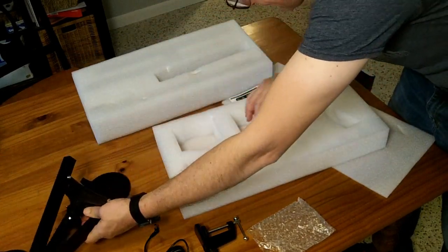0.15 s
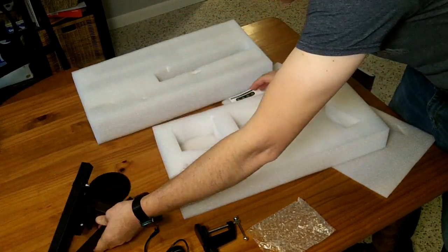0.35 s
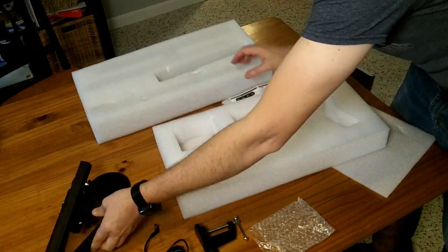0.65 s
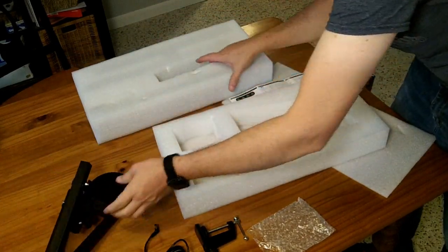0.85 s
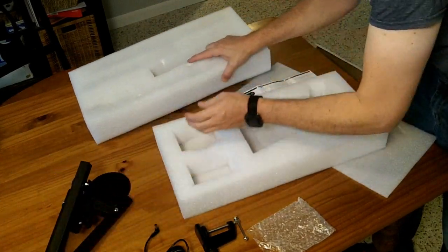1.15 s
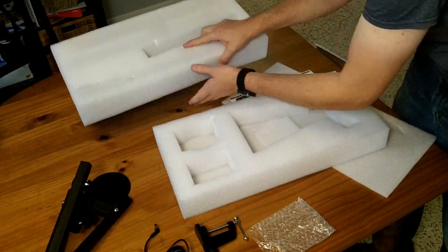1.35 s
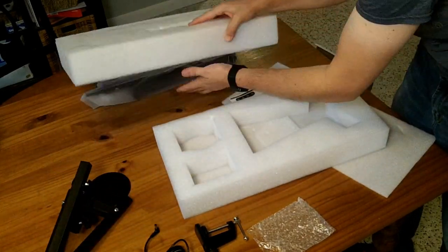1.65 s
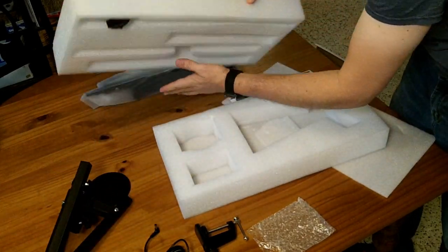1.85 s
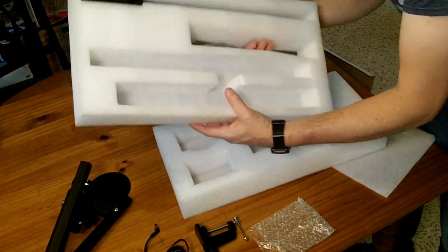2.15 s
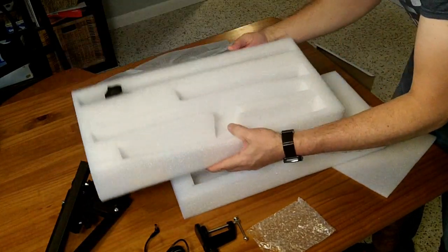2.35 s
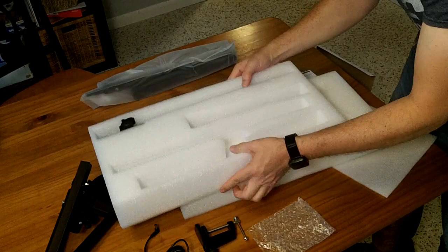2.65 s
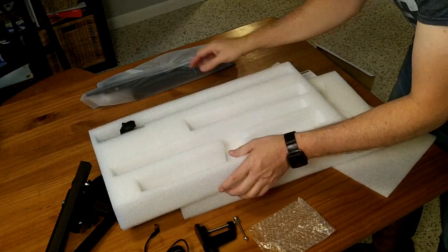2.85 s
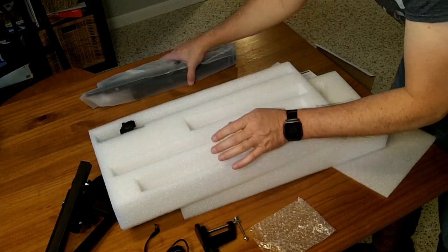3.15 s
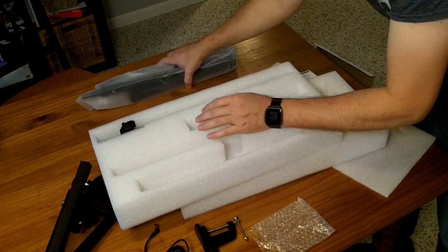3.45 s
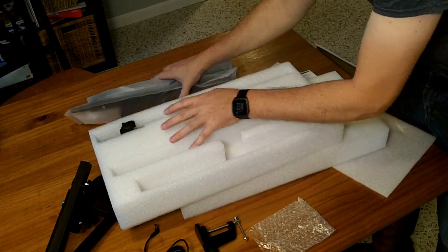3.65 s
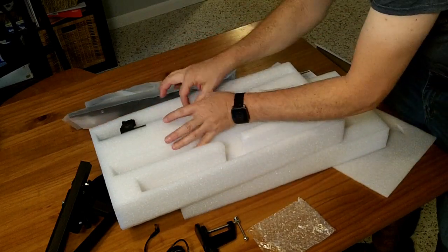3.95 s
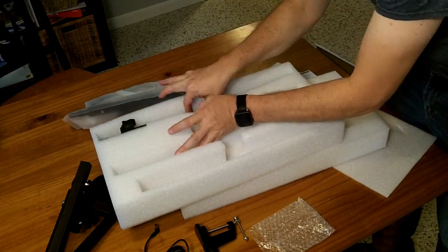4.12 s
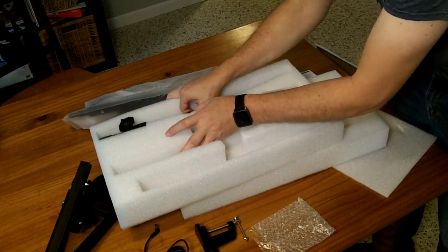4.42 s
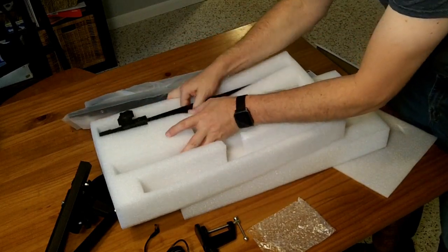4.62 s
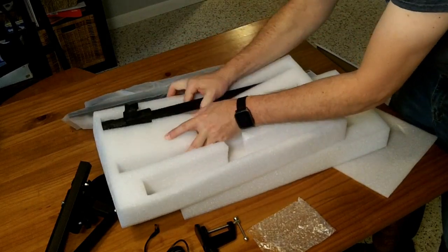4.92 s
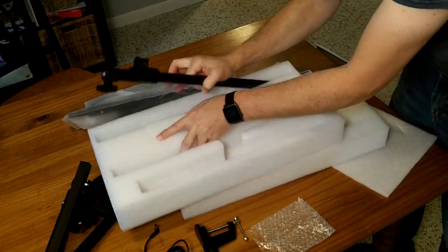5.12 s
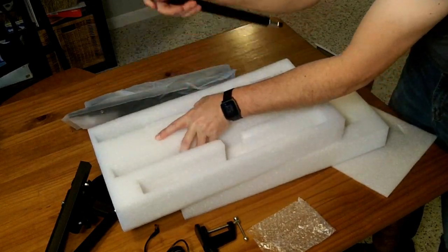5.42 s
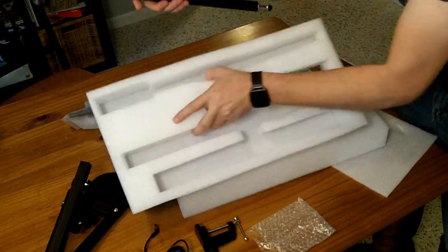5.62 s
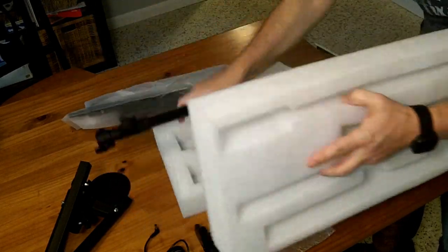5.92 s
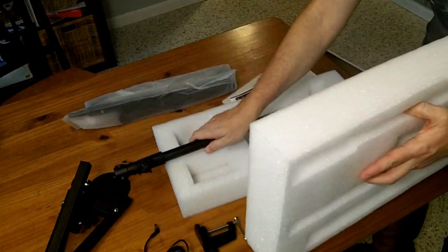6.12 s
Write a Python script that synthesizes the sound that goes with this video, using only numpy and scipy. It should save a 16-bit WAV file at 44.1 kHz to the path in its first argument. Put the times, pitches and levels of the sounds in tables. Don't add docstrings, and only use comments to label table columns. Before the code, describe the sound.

A loud wooden scrape and a clattering metal set-down come first. Dry foam rubbing follows in short irregular strokes, with crackly cell pops, faint skin squeaks and muffled thumps on the table top. Midway a thin bag rustles and drags with a low groan. The sharpest snaps come late, then handling fades into steady room hiss, heard from about a metre through a modest camera microphone.

```python
import sys
import numpy as np
from scipy import signal
from scipy.fft import rfft, irfft, next_fast_len
from scipy.io import wavfile
from scipy.ndimage import uniform_filter1d

SR = 44100
rng = np.random.default_rng(int(sys.argv[2]) if len(sys.argv) > 2 else 0)


def to_wav(sig):
    pcm = np.clip(np.atleast_2d(sig), -1, 1) * 32767
    pcm = np.round(pcm).astype(np.int16)
    wavfile.write(sys.argv[1], SR, pcm.T)


def linear_from_db(decibels):
    return 10 ** (np.asarray(decibels, float) / 20)


N = 276683
T = np.arange(N) / SR


def level(x, db=0):
    return x * linear_from_db(db) / np.sqrt(np.mean(x ** 2))


def colour(x, points, lo_hz=1, hi_hz=30000, slope=5):
    size = next_fast_len(N + 8192)
    size += size % 2
    f = np.maximum(np.fft.rfftfreq(size, 1 / SR), 1)
    hz, db = np.transpose(points)
    gain = linear_from_db(np.interp(np.log(f), np.log(hz), db))
    gain = gain / np.sqrt((1 + (lo_hz / f) ** slope) * (1 + (f / hi_hz) ** slope))
    cepstrum = irfft(np.log(gain + 1e-7))
    cepstrum[1:size // 2] *= 2
    cepstrum[size // 2 + 1:] = 0
    return irfft(rfft(x, size) * np.exp(rfft(cepstrum)))[:N]


def bandpass(x, order, lo_hz, hi_hz):
    return signal.sosfilt(signal.butter(order, [lo_hz, hi_hz], "band", fs=SR, output="sos"), x)


def ring(x, modes):
    out = 0
    for hz, db, t60_s in modes:
        pole = np.exp(2j * np.pi * hz / SR - np.log(1000) / (t60_s * SR))
        out = out + linear_from_db(db) * signal.lfilter([1], [1, -pole], x).imag
    return out


def walk(rate_hz):
    k = int(SR / rate_hz)
    held = np.repeat(rng.standard_normal(N // 50), k)[:N]
    return uniform_filter1d(uniform_filter1d(held, k), k)


def curves(table, fade_s=0.0064):
    s, *columns = np.transpose(table)
    gate = np.clip(np.minimum(T - s[0], s[-1] - T) / fade_s + 1, 0, 1)
    return gate, [np.interp(T, s, c) for c in columns]


def grains(per_s, spread_db):
    hit, size, sign = rng.random((3, N))
    return level((hit < per_s / SR) * linear_from_db(-spread_db * np.log(size + .03)) * np.sign(sign - .5))


def blows(rows):
    out = np.zeros(N + SR)
    for s, db, ms in rows:
        n = max(int(ms * SR / 1000), 2)
        start = int(s * SR)
        out[start:start + n] += linear_from_db(db) * np.sin(np.pi * (np.arange(n) + .5) / n) / n
    return out[:N]


SWELL_DB = 10.5
LET_GO_DB, LET_GO_S = 4, 0.017


def strokes(rows, release_db_s):
    t = T[::32]
    s, swell, hold, db = np.transpose(rows)[:, :, None]
    swell, hold = np.maximum(swell, .001), np.maximum(hold, 0)
    after = np.maximum(t - s - swell - hold, 0)
    db = db - SWELL_DB * np.clip(1 - (t - s) / swell, 0, 1)
    db = db - release_db_s * after - LET_GO_DB * np.minimum(after / LET_GO_S, 1)
    power = np.sum((t >= s) * linear_from_db(2 * db), axis=0)
    return np.interp(T, t, 10 * np.log10(power + 1e-12))


# f/Hz, density/dB
FOAM_TONE = [(35, -52), (60, 4), (108, -33), (213, -2.5), (289, -4.5), (523, 9), (853, 0), (1160, 3.5),
             (1480, 1.5), (3490, -3.5), (6180, -9.5), (7280, -16), (7900, -25), (10300, -71), (17400, -120)]
# start/s, swell/s, hold/s, level/dB, weight on block/dB
HAND_STROKES = [(0.354, 0.083, 0.11, -55, -2), (0.569, 0.0091, 0.061, -51.5, -0.5),
                (0.703, 0.0011, 0.0032, -35, 4), (0.924, 0.034, 0.073, -46, 2.5), (1.044, .012, 0.062, -52.5, 0),
                (1.134, 0.047, 0.091, -39.5, -1.5), (1.271, 0.022, 0.078, -40.5, -2.5),
                (1.342, 0.017, 0.038, -39.5, 1), (1.572, .003, 0.0033, -52, -6), (1.9, .006, 0.16, -62.5, -6),
                (2.075, 0.0034, 0.055, -43, -1), (2.131, 0.021, 0.011, -38, -1), (2.182, .01, 0.082, -49, 2),
                (2.278, .004, 0.039, -35.5, -2), (2.345, 0.025, 0.012, -38, -6), (2.39, .01, 0.077, -41.5, -6),
                (2.449, 0.052, 0.0051, -40, -2.5), (2.52, 0.018, 0.1, -50.5, 3),
                (2.61, 0.011, 0.021, -39.5, -1.5), (2.652, 0.033, 0.071, -38.5, -4),
                (2.788, 0.015, 0.044, -38, -5.5), (2.864, .01, 0.078, -52, 4), (2.942, 0.02, 0.037, -54.5, 0),
                (3.01, 0.015, 0.021, -48.5, 0.5),
                (3.191, 0.047, 0.059, -40, -5), (3.33, 0.045, 0.013, -43, -1.5),
          (3.829, 0.025, 0.052, -44.5, 1.5), (4.0, 0.029, 0.022, -47.5, 1),
          (4.053, 0.0046, 0.042, -42, 1.5), (4.115, 0.0031, .004, -35.5, -5), (4.17, 0.04, 0.04, -41.5, 1),
          (4.25, 0.035, 0.16, -44.5, 2), (4.31, 0.022, .03, -41, 1), (4.411, 0.0082, 0.014, -38, -2),
          (4.444, 0.0036, 0.0061, -35, -1.5), (4.465, 0.005, 0.01, -33.5, -4),
          (4.5, 0.022, 0.14, -47, -0.5), (4.69, 0.034, 0.19, -51.5, -0.5), (4.919, 0.29, 0.049, -41.5, 0.5),
          (5.149, 0.00093, 0.0096, -27, -1.5), (5.17, 0.003, 0.0038, -28.5, 0.5),
          (5.19, 0.0072, 0.023, -44, 0), (5.24, 0.024, 0.11, -40, -4.5), (5.33, 0.039, 0.042, -38.5, 0),
          (5.56, 0.074, 0.026, -46, -2.5), (5.66, 0.032, 0.034, -44.5, -0.5),
          (5.885, 0.013, 0.0044, -53.5, -2), (5.93, 0.12, 0.044, -56, -9), (6.104, 0.0085, 0.032, -53, 1.5)]
# start/s, swell/s, hold/s, level/dB, weight/dB
BAG = [
    (3.447, 0.093, 0.13, -56, -3),
    (3.574, 0.035, 0.073, -51.5, -1),
    (3.656, 0.049, 0.067, -48, 2),
    (3.763, 0.03, 0.06, -47, -2),
]
RELEASE_DB_S = 136
FIZZ_DB, SCRAPE_DB, HUM_DB = -3.5, -0.5, -7
FIZZ_PER_WEIGHT, SCRAPE_PER_WEIGHT, HUM_PER_WEIGHT = 0.33, 0.94, 1.55
RUSTLE_LINGERS, SCRAPE_LINGERS, HUM_LINGERS = 0.86, 0.75, 0.62
BAG_THIN_DB, BAG_FIZZ_DB, BAG_HOLLOW_DB = -7, 6.5, -5
CRACKLE = 0.2


def foam():
    rows = np.vstack([HAND_STROKES, BAG])
    bag = np.arange(len(rows)) >= len(rows) - len(BAG)
    shape, db, weight = rows[:, :3], rows[:, 3], rows[:, 4]

    def layer(rel_db, per_weight, lingers):
        return strokes(np.c_[shape, db + rel_db + per_weight * weight], lingers * RELEASE_DB_S)

    rustle_db = layer(BAG_THIN_DB * bag, 0, RUSTLE_LINGERS)
    bag_db = strokes(np.array(BAG)[:, :4], RELEASE_DB_S) - 2.5
    fizz_db = layer(FIZZ_DB + BAG_FIZZ_DB * bag, FIZZ_PER_WEIGHT, 1)
    scrape_db = layer(SCRAPE_DB + BAG_HOLLOW_DB * bag, SCRAPE_PER_WEIGHT, SCRAPE_LINGERS)
    hum_db = layer(HUM_DB, HUM_PER_WEIGHT, HUM_LINGERS)

    grit = np.clip(0.27 + 0.021 * (rustle_db + 44.5), 0, 1)
    slips = np.sqrt(1 - grit) * rng.standard_normal(N) + np.sqrt(grit) * grains(2500, 3.0)
    slips = slips * linear_from_db(1.64 * walk(45)) + CRACKLE * grains(260, 3.9)
    bands = [(1836, 4170, rustle_db), (3000, 4300, bag_db), (4500, 4890, fizz_db),
             (656, 2100, scrape_db), (109, 434, hum_db)]
    out = 0
    for lo_hz, hi_hz, band_db in bands:
        out = out + level(colour(slips, FOAM_TONE, lo_hz, hi_hz)) * linear_from_db(band_db + 1.4 * walk(22.116))
    return out


# start/s, end/s, level/dB
PAUSES = [
    (1.045, 1.058, -4),
    (2.386, 2.445, -2.5),
    (3.041, 3.188, -4),
    (5.735, 5.88, -2.5),
]


def pauses():
    return linear_from_db(sum(db * np.clip(np.minimum(T - a, b - T) / .006, 0, 1) for a, b, db in PAUSES))


# t/s, level/dB, f/Hz, t60/s
SNAPS = [(1.1712, -27, 3800, 0.066), (1.351, -21, 4260, 0.093), (1.6053, -33, 2400, 0.034),
         (2.079, -32, 3160, 0.025), (2.1439, -35, 3570, 0.025), (2.2802, -30, 2270, 0.068),
         (2.379, -20.5, 4030, 0.039), (2.6093, -27, 4070, 0.079), (2.799, -23, 2990, 0.021),
         (3.1943, -29, 4050, 0.04), (3.2212, -27, 3080, 0.032), (4.0148, -31, 3120, 0.032),
         (4.0585, -20, 3670, 0.071), (4.1204, -13.5, 4000, 0.027), (4.414, -18.5, 3970, 0.043),
         (4.4298, -15, 2920, 0.059), (4.4494, -18, 3730, 0.018), (4.4773, -10.5, 3600, 0.023),
         (4.8703, -30.5, 4500, 0.064), (5.0867, -25, 3180, 0.05), (5.1503, -7.5, 3840, 0.036),
         (5.1735, -6, 3100, 0.025), (5.956, -35, 4100, 0.04), (6.233, -32.5, 3630, 0.04)]
# t/s, level/dB, f/Hz, t60/s
TICKS = [(1.5707, -37, 3030, 0.0092), (1.903, -42, 3300, 0.0077), (3.2833, -23, 3440, 0.0059),
         (3.5032, -28.5, 5850, 0.0092), (3.682, -32, 3780, 0.0096), (4.4368, -20.5, 3000, 0.0096),
         (4.4785, -18, 3370, 0.0097), (4.5044, -37, 4500, 0.0081), (4.527, -34, 4640, 0.011),
         (5.285, -38, 4100, 0.0053), (5.459, -38, 4500, 0.0038)]
TICK_SPIKE = 0.37


def snaps(rows, gain_db, spike=0.0):
    out, t = np.zeros(N + SR), T[:8192]
    noise = rng.standard_normal((len(rows), len(t)))
    for (s, db, hz, t60_s), burst in zip(rows, noise):
        burst = burst + spike * 8 * (t == 0)
        burst = bandpass(burst, 2, hz * 0.74, min(hz * 1.31, 7000))
        start = int(s * SR)
        out[start:start + len(t)] += level(burst, db + gain_db) * linear_from_db(-60 * t / t60_s)
    return out[:N]


# t/s, level/dB, f/Hz
BURSTS = [(0.457, -34, 5000), (0.5854, -34, 2080), (2.281, -25, 2400), (2.312, -22, 5070),
          (2.376, -24, 2500), (2.38, -17, 4070), (2.6249, -31, 4160), (2.6994, -31, 3320),
          (2.7594, -33, 5390), (2.8194, -28, 4580), (3.243, -28, 2080), (3.505, -30, 3400),
          (3.6803, -18.5, 3660), (3.7154, -33, 2660), (3.7554, -27, 4970), (4.219, -30, 3450),
          (4.3264, -33, 4900), (4.336, -27, 1530), (4.3635, -28, 4370), (4.4124, -23, 4000),
          (4.4314, -23, 2950), (4.4465, -11.5, 3270), (4.4502, -14, 2050), (4.4709, -18, 2200),
          (4.476, -15, 3250), (4.4825, -19, 3550), (4.505, -23, 4500), (4.529, -31, 4660),
          (5.1515, -12, 3800), (5.175, -7, 4570), (5.1804, -20, 2470), (5.199, -19, 2440),
          (5.283, -19, 3600), (5.391, -27, 2060), (5.457, -24, 4900), (5.692, -28.5, 3340)]
BURST_DB, BURST_T60_S = -3, 0.007


def bursts():
    out, t = np.zeros(N + SR), T[:1024]
    onset = np.minimum(t / .0002, 1)
    for s, db, hz in BURSTS:
        cycles = sum(np.sin(2 * np.pi * hz * k * t) for k in (0.82, 1, 1.2)) / 2.7 * onset
        start = int(s * SR)
        out[start:start + len(t)] += linear_from_db(db + BURST_DB - 60 * t / BURST_T60_S) * cycles
    return out[:N]


# t/s, length/s, f/Hz, width/Hz, level/dB
SQUEAKS = [(0.93, 0.12, 2870, 180, -49), (5.9, 0.21, 1360, 1200, -53.5), (3.2, 0.1, 1500, 980, -57),
           (2.12, 0.039, 1230, 290, -50), (2.299, 0.12, 1360, 180, -37.5), (4.054, 0.019, 1200, 250, -46),
           (1.569, 0.036, 2960, 170, -51.5), (3.012, 0.038, 1800, 640, -48),
           (6.113, 0.12, 1700, 1500, -52.5), (3.775, .065, 408, 45, -47), (3.83, 0.08, 640, 60, -50),
           (3.87, 0.055, 520, 72, -48), (4.3, 0.073, 620, 280, -44.5), (4.47, 0.026, 820, 210, -36.5),
           (4.9, 0.11, 500, 120, -54), (4.75, 0.1, 460, 120, -55), (4.57, .07, 810, 140, -52.5),
           (2.675, .04, 520, 120, -50), (2.7, .06, 1220, 200, -47), (3.225, 0.044, 1140, 140, -48),
           (5.172, 0.013, 520, 180, -32), (4.118, 0.015, 2500, 500, -38.5), (4.55, 0.16, 3000, 760, -52),
           (0.0, 0.056, 1060, 70, -31), (0.05, .095, 1100, 90, -29), (0.15, .16, 750, 54, -31),
           (.17, 0.14, 366, 60, -32), (0.7, .08, 720, 140, -38), (1.055, .06, 430, 55, -49),
           (.7, .016, 3600, 300, -33), (.72, .03, 5000, 2000, -42), (2.345, .04, 4100, 300, -43),
           (2.617, .018, 4200, 400, -39), (5.171, .01, 4600, 700, -26), (5.174, .014, 2500, 400, -28),
           (3.59, .05, 150, 30, -52), (4.62, .12, 2800, 1500, -55)]


def squeaks():
    out, noise = 0, rng.standard_normal(N)
    for s, length_s, hz, width_hz, db in SQUEAKS:
        t60_s = np.log(1000) / (np.pi * width_hz)
        tone = level(ring(noise, [(hz, 0, t60_s)]), db)
        out = out + tone * np.sin(np.pi * np.clip((T - s) / length_s, 0, 1) ** 0.45)
    return out


# t/s, slip rate/Hz, level/dB
GROAN = [
    (3.58, 146, -62),
    (3.645, 146, -50),
    (3.66, 147.1, -46),
    (3.72, 150, -36.5),
    (3.745, 186.5, -41),
    (3.78, 201.8, -39.5),
    (3.83, 204, -41),
    (3.845, 206.5, -50),
    (3.884, 211, -52),
    (3.93, 207, -65),
]


def groan():
    gate, (hz, db) = curves(GROAN, fade_s=0.011)
    phase = np.cumsum(hz * (1 + .03 * walk(120))) / SR
    pulses = (np.diff(np.floor(phase), prepend=0) > 0) * linear_from_db(3.1 * rng.standard_normal(N))
    pulses = signal.sosfilt(signal.butter(2, 120, "high", fs=SR, output="sos"), pulses)
    modes = [(146, -6, 0.056), (195, -9, 0.04), (290, -2, 0.02),
             (415, 3.0, 0.03), (530, -6, .03), (660, -3.0, 0.036)]
    return gate * level(ring(pulses, modes)) * linear_from_db(db - 7.5)


# t/s, pressure level/dB, brightness of faster slide/dB
DRAG = [
    (0.0, -25, 1.5),
    (0.076, -28, 5),
    (0.13, -28.5, 7),
    (0.156, -21, -4),
    (0.166, -25, -2.5),
    (0.262, -24, -6),
    (0.28, -24.5, -4.5),
    (0.466, -44, -6.5),
    (0.6, -59, 3),
]
# f/Hz, density/dB
DRAG_TONE = [(35, -32), (60, -13), (118, -17.5), (369, -0.5), (512, 1), (725, -0.5), (1090, -4.5),
             (1890, -12), (4280, -24.5), (6180, -39.5), (7900, -81), (10300, -93), (17400, -120)]
# start/s, swell/s, hold/s, level/dB
ROCKING = [
    (.7, 0.0024, 0.045, -24.5),
    (.795, 0.0058, 0.02, -28),
    (.9, 0.0096, 0.02, -46),
]
# f/Hz, level/dB, t60/s
TABLE = [(143, -4.5, 0.092), (191, -7.5, 0.12), (221, 1.5, 0.098), (256.6, 2, 0.091), (326.5, -2, 0.11),
         (367, -8, 0.086), (423, -0.5, 0.11), (520, -4, .08), (647, -9, 0.073), (725, -6.5, 0.08),
         (880, -11, 0.053), (1080, -8.5, 0.065), (1326, -10, 0.048)]
DRAG_HUM_DB, DRAG_SCRAPE_DB, DRAG_RASP_DB = -4, -1, -10
ROCKING_RUMBLE_DB, ROCKING_RELEASE_DB_S = -4.5, 104


def drag():
    gate, (db, fast_db) = curves(DRAG)
    force = rng.standard_normal(N) + 0.3 * grains(1500, 3.1)
    high_modes = level(ring(force, TABLE[8:]), -9.5)
    low_modes = level(ring(force, TABLE[:8]), -14.0)
    rumble = level(level(colour(force, DRAG_TONE, 684, 1310)) + high_modes)
    hum = level(level(colour(force, DRAG_TONE, 138, 398)) + low_modes)
    scrape = level(colour(force, DRAG_TONE, 1320, 2930))
    rasp = level(colour(force, DRAG_TONE, 2430))
    bright = linear_from_db(DRAG_SCRAPE_DB + fast_db) * scrape + linear_from_db(DRAG_RASP_DB + 0.89 * fast_db) * rasp
    sliding = gate * linear_from_db(db) * (rumble + linear_from_db(DRAG_HUM_DB - 0.071 * fast_db) * hum + bright)

    rock_rumble = level(colour(force, DRAG_TONE, 450, 1120)) + linear_from_db(-8.0) * scrape
    rocking = linear_from_db(strokes(ROCKING, ROCKING_RELEASE_DB_S)) * (hum + linear_from_db(ROCKING_RUMBLE_DB) * rock_rumble)
    return linear_from_db(1.3 * walk(39.1)) * (sliding + rocking)


# t/s, level/dB, click relative level/dB, contact/ms
KNOCKS = [
    (0.154, -17, -32, 1.2),
    (0.7, -11.5, -12, 1.3),
    (0.726, -11.5, -21, 0.53),
    (0.754, -24, -23, 0.84),
    (0.778, -24, -30, 0.91),
    (0.807, -20, -34, 0.9),
    (0.832, -26, -30, .8),
    (0.88, -29, -30, 0.89),
    (1.058, -34.5, -30, 1.2),
]
# f/Hz, level/dB, t60/s
METAL = [(3520, 0, .016), (3760, -3, .016), (2700, -7, .02), (4900, -9, .015), (5700, -13, .012)]
# t/s, level/dB, contact/ms
THUDS = [(0.509, -35.5, 2.6), (1.397, -34, 1.25), (2.075, -29, 1.24), (2.538, -44, 0.72), (2.62, -33, 1.3),
         (2.834, -32.5, 1.6), (2.926, -33.5, 2), (3.235, -31, 2.4), (3.371, -33, 1.7), (3.651, -36, 3),
         (4.441, -46, 1.5), (5.185, -26, 2.2), (5.345, -35, 2.2)]
THUD_DAMPING = 0.61


def knocks():
    hard = blows([(s, db, ms) for s, db, _, ms in KNOCKS])
    clicks = blows([(s, db + rel_db, .08) for s, db, rel_db, _ in KNOCKS])
    damped = [(hz, db, t60_s * THUD_DAMPING) for hz, db, t60_s in TABLE]
    wood = linear_from_db(-12.5) * ring(hard, TABLE) + linear_from_db(-8.5) * ring(blows(THUDS), damped)
    # f/Hz, gain/dB; deep bass and treble fall away, fullest near 900 Hz
    wood_tone = [(60, -19.5), (150, -2.0), (260, 2.5), (450, 2.5), (900, 11.0), (2500, -22)]
    return linear_from_db(3.5) * ring(clicks, METAL) + colour(wood, wood_tone)


# t/s, push level/dB, contact/ms
POP = [
    (.1536, 25.0, .42),
]


def pop():
    return bandpass(blows(POP), 1, 200, 5500)


# t/s, level/dB
JOLTS = [(-.04, -37), (.12, -62), (.46, -45), (.7, -34.5), (2.04, -45.5), (2.27, -64), (2.44, -55),
         (2.58, -51), (2.89, -48), (3.235, -49), (4.06, -57), (4.21, -59), (4.86, -66), (5.16, -42),
         (5.84, -58), (6.17, -61)]
SWAY_REST_DB, SWAY_SWELL_S, SWAY_RELEASE_DB_S = -66.5, 0.038, 93


def sway():
    jolt_db = strokes([(s, SWAY_SWELL_S, 0, db) for s, db in JOLTS], SWAY_RELEASE_DB_S)
    modes = [(36.4, 0.5, 0.4), (74.7, 1.0, 0.33), (109, -9.0, 0.17)]
    return np.hypot(linear_from_db(jolt_db), linear_from_db(SWAY_REST_DB)) * level(ring(rng.standard_normal(N), modes))


ROOM_T60_S, ROOM_DB, KNOCK_ROOM_DB = 0.5, -4.5, -7.5


def room(x):
    t = T[:SR // 2]
    tail = rng.standard_normal(len(t)) * linear_from_db(-60 * t / ROOM_T60_S) * np.clip(t / 0.0055 - 1, 0, 1)
    tail = signal.lfilter([1], [1, -.6], tail)
    return signal.fftconvolve(x, tail / np.sqrt(np.sum(tail ** 2)))[:N]


# f/Hz, density/dB
FLOOR = [(12, -21), (20, 0), (57, -4), (131, -7.5), (321, -8), (402, -6), (601, -11), (811, -7.5),
         (919, -15), (1040, -13), (3460, -15), (5850, -19.5), (7900, -34), (10300, -67), (17400, -120)]
FLOOR_DB = -55.5


def floor():
    noise = level(colour(rng.standard_normal(N), FLOOR), FLOOR_DB - 3.0)
    return noise * linear_from_db(0.59 * walk(3.5))


def scene():
    thumps, hits = knocks(), snaps(SNAPS, -15.5) + groan()
    reflected = room(linear_from_db(ROOM_DB) * hits + linear_from_db(KNOCK_ROOM_DB) * thumps)
    handling = foam() * pauses() + snaps(TICKS, -3.7, TICK_SPIKE) + bursts() + squeaks()
    dragging = drag() + pop()
    return (handling + hits + dragging + thumps + sway() + reflected + floor())[None]


# level under 1.5 kHz/dB, highest f kept/Hz
REACH = [(-52, 15400), (-42, 15100), (-36, 14400), (-33, 13600), (-30.5, 12800), (-29, 11300)]


def starve(core, mirror, hiss):
    frame = dict(fs=SR, nperseg=1024, noverlap=512)
    (f, _, low), (_, _, image), (_, _, air) = (signal.stft(v, **frame) for v in (core, mirror, hiss))
    low_power = np.sum(abs(low[f < 1500]) ** 2, axis=0)
    loud_db = uniform_filter1d(10 * np.log10(low_power + 1e-12), size=5)
    top = (image + air) * (f[:, None] < np.interp(loud_db, *np.transpose(REACH)))
    chance = rng.random((len(f) // 3 + 1, len(loud_db) // 4 + 1))
    chance = np.repeat(np.repeat(chance, 3, axis=0), 4, axis=1)[:len(f), :len(loud_db)]
    share = np.interp(f, [6900, 7500, 8200, 8500], [0, .5, .55, .3])[:, None]
    share = share * np.interp(loud_db, [-60, -50, -42], [.35, .9, 1.4])
    return signal.istft((low + top) * (chance > share), **frame)[1][:N]


def low_pass(x):
    return signal.sosfilt(signal.butter(12, 15480, fs=SR, output="sos"), x)


# f/Hz, gain/dB
MIRROR = [(8000, -36), (8400, 4.5), (9200, -6), (10000, -13.5), (11300, -10.5), (12400, -13), (13300, -44),
          (14000, -46)]
# f/Hz, density/dB
HISS = [(4820, -61), (8200, -7.5), (8940, -10), (10200, -5.5), (11500, -4.5), (13600, -3), (14500, -6.5),
        (15300, -5.5)]
HISS_DB = -64
CORE_HZ, SEAM_HZ = 16000, 12000


def record(dry):
    core = signal.sosfilt(signal.ellip(6, .5, 50, 7600, fs=SR, output="sos"), dry[0])
    image = core * np.cos(2 * np.pi * CORE_HZ * T)
    mirror = colour(image, [(7800, -101), *MIRROR, (14500, -102)])
    hiss = level(colour(rng.standard_normal(N), HISS), HISS_DB + 0.85)
    sound = signal.lfilter(*signal.iirnotch(SEAM_HZ - 60, 22, fs=SR), starve(core, mirror, hiss))
    edge = signal.butter(2, [7780, 8130], "bandstop", fs=SR, output="sos")
    mix = signal.sosfilt(edge, sound)[None]
    return low_pass(mix)


dry = scene()
out = record(dry)
to_wav(out)
```